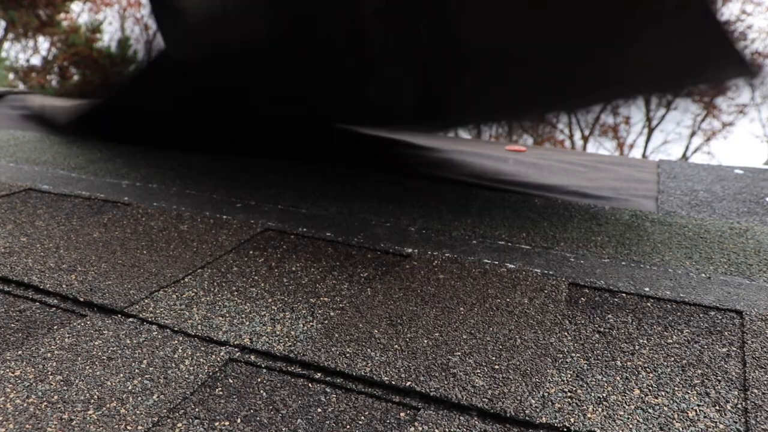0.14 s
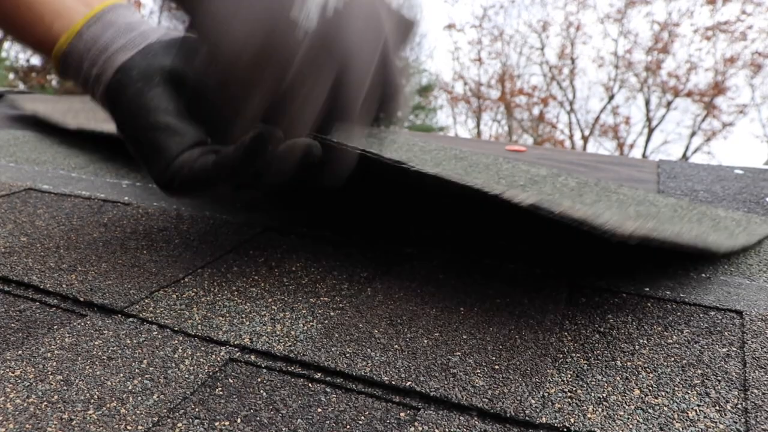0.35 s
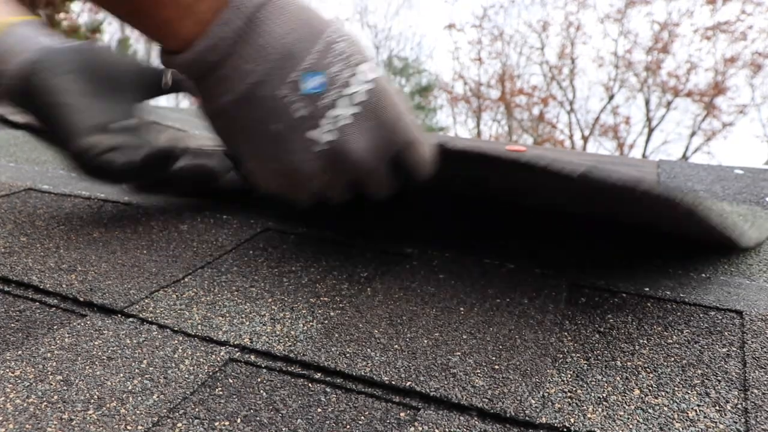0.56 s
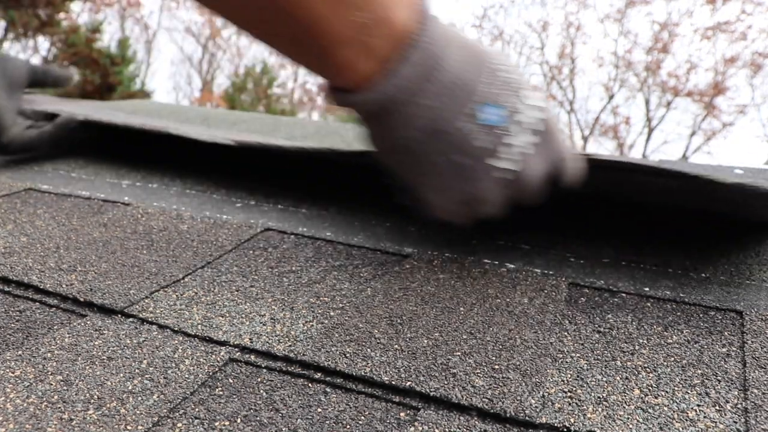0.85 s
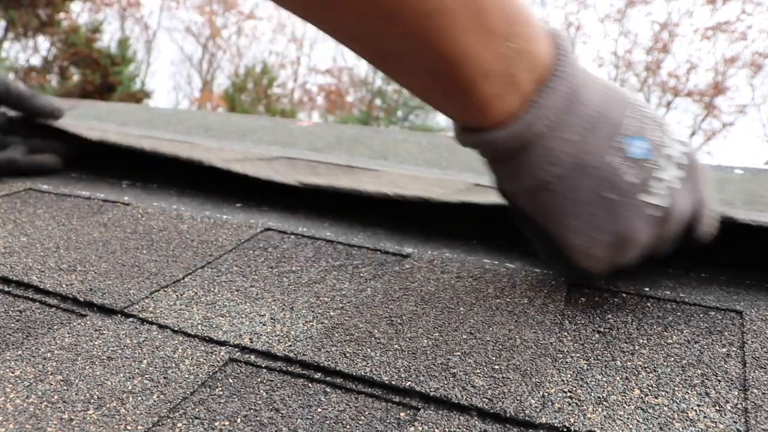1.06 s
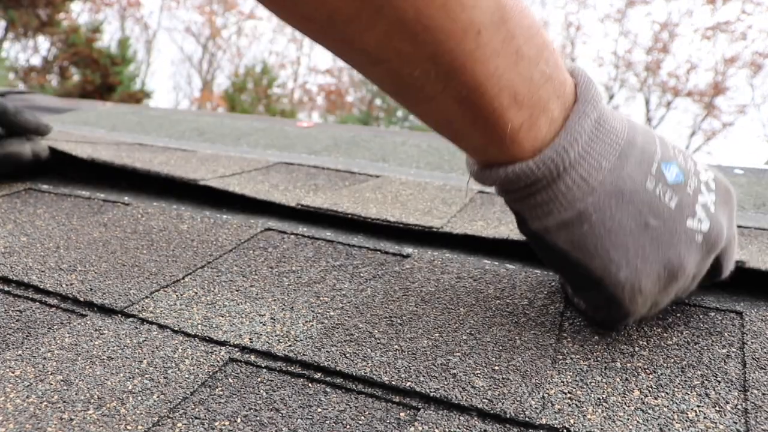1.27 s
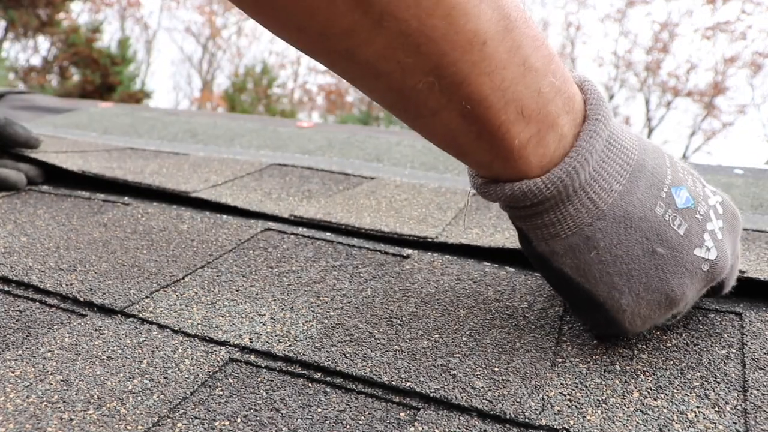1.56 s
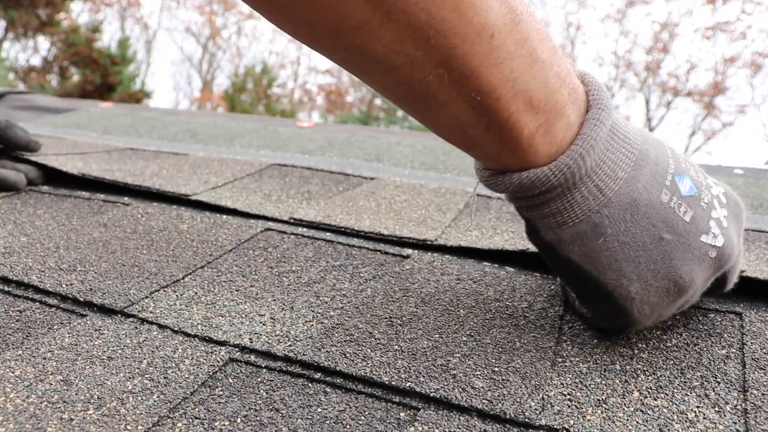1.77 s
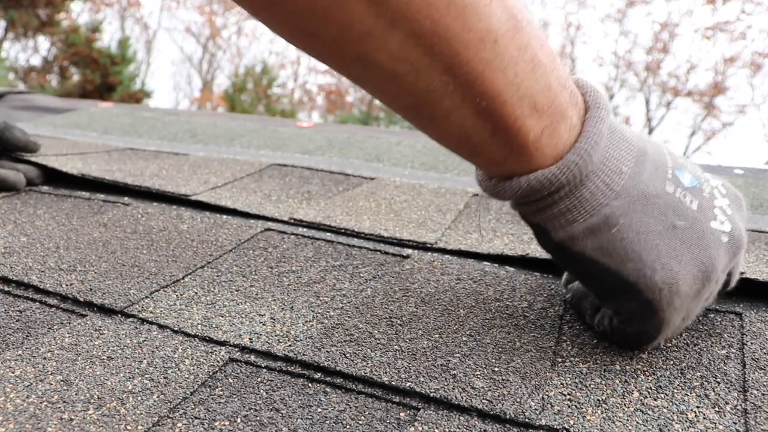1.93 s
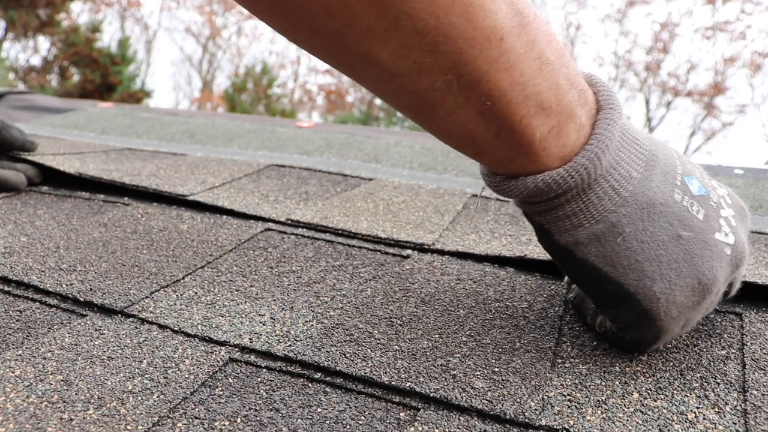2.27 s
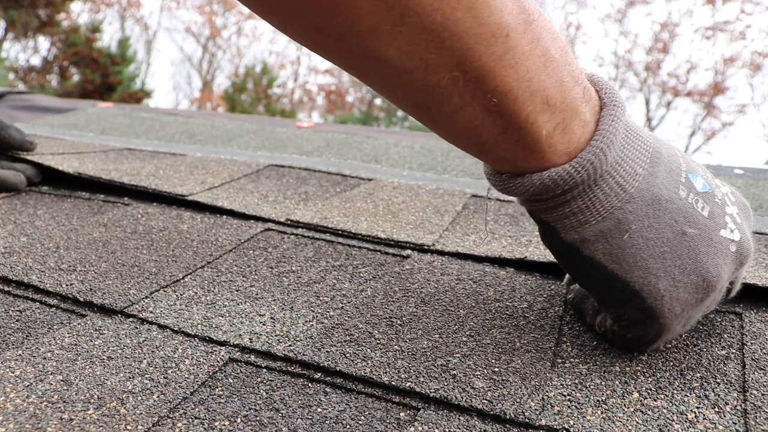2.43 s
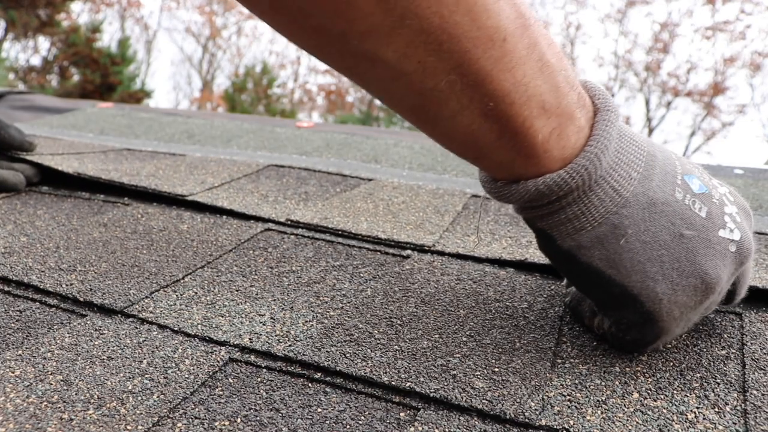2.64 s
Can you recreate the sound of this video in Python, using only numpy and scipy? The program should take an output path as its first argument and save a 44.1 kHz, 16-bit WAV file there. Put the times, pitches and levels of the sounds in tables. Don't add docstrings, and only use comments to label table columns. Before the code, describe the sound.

Close up outdoors, a limp, sandy shingle lands with a dull slap and rubs loudly over others for about a second, then short scuffs and tiny granule snaps follow over low far traffic.

```python
import sys
import numpy as np
from scipy import signal
from scipy.fft import rfft, irfft
from scipy.io import wavfile
from scipy.ndimage import uniform_filter1d

SR = 44100
rng = np.random.default_rng(int(sys.argv[2]) if len(sys.argv) > 2 else 0)


def gain_from_decibels(decibels):
    exponent = np.asarray(decibels, float) / 20
    return 10 ** exponent


def inscribe(sig):
    pcm = np.round(np.clip(np.atleast_2d(sig).T, -1, 1) * 32767)
    wavfile.write(sys.argv[1], SR, pcm.astype(np.int16))


N = 123479
EDGES = 28 * 2 ** np.arange(0, 9.6, .5)


def rms_one(x):
    return x / np.sqrt(np.mean(x ** 2) + 1e-20)


def at_hz(points, hz):
    point_hz, values = np.array(points).T
    return np.interp(np.log(hz), np.log(point_hz), values)


def centre(k):
    return np.sqrt(EDGES[k] * EDGES[k + 1])


def band(x, k):
    sos = signal.butter(2, EDGES[k:k + 2], "band", fs=SR, output="sos")
    return signal.sosfilt(sos, x + 1e-18)


def drift(rate_hz):
    r = np.exp(-2 * np.pi * rate_hz / SR)
    slow = signal.lfilter([1], [1, -2 * r, r * r], rng.standard_normal(N + SR))
    return rms_one(slow[SR:])


def scatter(index, sizes, pan_db, lag):
    ears = []
    for ear in (1, -1):
        arrival = np.clip(index + ear * lag // 2, 0, N - 1)
        ears.append(np.bincount(arrival, sizes * gain_from_decibels(ear * pan_db / 2), N))
    return np.array(ears)


def traffic(rubbing_db):
    # hz, level_db
    hum = [(18, -39), (30, -30.5), (179, -2), (1190, -18), (1500, -19.5), (2060, -21.5), (3220, -21),
           (4080, -23), (16000, -40)]
    # hz, likeness (1 = same)
    likeness = [(30, .5), (150, 1), (600, 0.8), (2000, .3), (8000, 0.05)]
    # time_s, level_db
    passing = [(0, 4.5), (1.5, 6.5), (2.0, 7.5), (2.8, 3.5)]
    level_db, patchy_db = -53, 1.2
    duck_from_db, duck_share, recover_db_per_s = -34, 0.42, 90

    out, white = 0, rng.standard_normal((2, 2, N))
    for k in range(len(EDGES) - 1):
        hz = centre(k)
        mid, side = band(white[k % 2], k)
        alike = np.clip(at_hz(likeness, hz), -1, 1)
        stereo = np.sqrt(1 + alike) * mid + np.sqrt(1 - alike) * side * [[1], [-1]]
        out = out + gain_from_decibels(at_hz(hum, hz) + patchy_db * drift(18)) * stereo
    t = np.arange(N) / SR
    ramp_db = recover_db_per_s * t
    held_db = np.maximum.accumulate(rubbing_db + ramp_db) - ramp_db
    held_db = uniform_filter1d(held_db, size=2000)
    duck_db = duck_share * np.maximum(held_db - duck_from_db, 0)
    swell_db = np.interp(t, *np.transpose(passing))
    return gain_from_decibels(level_db + swell_db - duck_db) * rms_one(out)


def drag():
    # start_s, stop_s, level_db
    drags = [
        (1.686, 1.876, -55),
        (1.899, 2.096, -50.5),
    ]
    # centre_hz, width_hz, level_db
    tones = [
        (1367, 440, 1.0),
        (2280, 250, -6.5),
        (3370, 900, -4),
    ]
    t, out, envelope = np.arange(N) / SR, 0, 0
    for start_s, stop_s, db in drags:
        arch = np.sin(np.pi * np.clip((t - start_s) / (stop_s - start_s), 0, 1))
        envelope = envelope + gain_from_decibels(db) * np.clip(3 * arch, 0, 1)
    for hz, width_hz, db in tones:
        sos = signal.butter(2, [hz - width_hz / 2, hz + width_hz / 2], "band", fs=SR, output="sos")
        tone = rms_one(signal.sosfilt(sos, rng.standard_normal((2, N))))
        out = out + gain_from_decibels(db) * tone * gain_from_decibels(3.7 * drift(5))
    return envelope * out


def slaps():
    # time_s, level_db
    landings = [
        (.166, -26),
        (.1995, -2),
        (.218, -11),
        (.408, -17.5),
        (.6, -20),
        (1.243, -16),
        (1.555, -24),
        (1.673, -27),
        (1.978, -22),
        (2.273, -38),
    ]
    # hz, level_db, t60_s
    modes = [
        (193, -10, .04),
        (520, -7.5, 0.035),
        (700, 7.5, 0.009),
        (1600, -5, 0.0027),
    ]
    out = np.zeros(N)
    for hz, level_db, t60_s in modes:
        blows = np.zeros(N)
        for time_s, db in landings:
            blows[int(time_s * SR)] = gain_from_decibels(db + level_db - 9)
        r, w = gain_from_decibels(-60 / (t60_s * SR)), 2 * np.pi * hz / SR
        out += signal.lfilter([0, np.sin(w)], [1, -2 * r * np.cos(w), r * r], blows + 1e-18)
    return out


def catches(side_db):
    # time_s, peak_db, centre_hz
    snaps = [(.0358, -28, 4120), (.1533, -27, 2400), (.199, -9, 2200), (.2184, -12, 2500),
             (.2334, -12, 1900), (.2614, -15, 4500), (.3202, -25, 3300), (.3527, -12, 2600),
             (.3657, -10, 1600), (.3724, -6, 2790), (.4114, -6, 7300), (.4773, -14, 3340),
             (.4805, -10, 9000), (.5045, -13, 9000), (.522, -22, 3000), (.5726, -6, 3000),
             (.5732, -10, 6500), (.5892, -8, 1900), (.5975, -7, 2500), (.647, -9, 2500), (.772, -10, 2000),
             (.812, -9, 2800), (1.017, -11, 3000), (1.053, -8, 3500), (1.0685, -10, 3000),
             (1.093, -9, 7000), (1.196, -17, 3000), (1.2116, -16, 3000), (1.2216, -14, 2710),
             (1.2445, -10, 7000), (1.2585, -10, 3000), (1.268, -10, 3000), (1.3235, -13, 3000),
             (1.3375, -12, 7000), (1.352, -16, 6500), (1.3734, -18, 8000), (1.3864, -19, 2920),
             (1.3999, -15, 3200), (1.4428, -14, 4500), (1.4503, -9, 7430), (1.46, -15, 7000),
             (1.4667, -11, 6000), (1.4794, -10, 4000), (1.5554, -12, 2910), (1.6362, -29, 4000),
             (1.6644, -20, 2600), (1.6731, -15, 4200),
             (1.9504, -27, 3500), (1.9778, -14, 2100), (2.0343, -33, 7500), (2.0517, -29, 4500),
            (2.0742, -27, 3560), (2.0986, -22, 5000), (2.1044, -22, 7000), (2.1227, -17, 2900),
            (2.1794, -16, 7070), (2.2264, -38, 5000), (2.2727, -24, 7550), (2.2824, -34, 7500),
            (2.3067, -17, 2100), (2.3334, -10, 4070), (2.3405, -15, 6000), (2.346, -20, 5000),
            (2.3605, -16, 4670), (2.3674, -20, 3770), (2.382, -22, 5500), (2.3914, -23, 5270),
            (2.4004, -24, 4020), (2.4139, -18, 3600), (2.4254, -24, 6890), (2.4508, -32, 3200),
            (2.4638, -28, 10000), (2.4748, -14, 7000), (2.487, -24, 3200), (2.492, -25, 4000),
            (2.5154, -20, 8410), (2.5222, -15, 3350), (2.5316, -14, 3100), (2.5496, -18, 10000),
            (2.554, -23, 5000), (2.6504, -27, 7430), (2.6729, -38, 7780), (2.6854, -40, 8500),
            (2.7038, -42, 10000), (2.7482, -29, 6600), (2.7687, -22, 3000), (2.786, -23, 4000)]
    decay_s, gain_db, ring, spread_s = .001, 1.0, .5, .000025
    fall_db = 3.0

    time_s, peak_db, hz = np.transpose(snaps)[:, :, None]
    steps = np.arange(512)
    rise_or_fall = np.where(steps < 30, .15, 1)
    envelope = np.exp(-np.abs(steps - 30) / (decay_s * SR * rise_or_fall))
    ringing = ring * np.sin(2 * np.pi * hz * steps / SR)
    crackle = (rng.standard_normal((len(time_s), 512)) + ringing) * envelope
    octaves = np.log2((np.arange(257) + 1) * SR / 512 / hz)
    loss_db = fall_db * octaves ** 2 * np.where(octaves < 0, 2, 1)
    crackle = irfft(rfft(crackle) * gain_from_decibels(-loss_db))
    crackle *= gain_from_decibels(peak_db + gain_db) / np.abs(crackle).max(axis=1, keepdims=True)
    index = ((time_s * SR).astype(int) + steps - 25).ravel()
    lag = np.round(rng.normal(0, spread_s * SR, len(time_s))).astype(int).repeat(512)
    return scatter(index, crackle.ravel(), side_db[index], lag)


def motion():
    # time_s, level_db, dulling_db_per_octave
    lay = [
        (0.155, -60, -8),
        (0.166, -27.5, 5),
        (0.187, -29, 6),
        (0.19, -20, 0),
        (0.205, -23, 2),
        (0.218, -19, 1),
        (0.234, -25.5, 2.5),
        (0.262, -24, 1),
        (.27, -31, 1.5),
        (0.316, -38.5, 4),
    ]
    shift = [
        (.335, -29, 2),
        (0.355, -21.5, 1.2),
        (0.371, -16, 2.9),
        (.385, -21, 2),
        (.4, -19, 1),
        (0.415, -24, -2.2),
        (0.459, -26.5, 1.5),
        (0.507, -31.5, -2),
        (.535, -36, 1.2),
    ]
    slide = [
        (0.562, -24.5, 3.2),
        (.582, -23, 1),
        (.59, -17.5, 0.8),
        (0.603, -16, 2.1),
        (.65, -19.5, 1.5),
        (.69, -24, 2.75),
        (0.759, -21, 1.5),
        (0.81, -16, 3.2),
        (.86, -20.5, 1.4),
             (.925, -16.5, 1.8),
        (.965, -19.5, 1.8),
        (1.02, -19.5, 1.8),
        (1.045, -20, 1.8),
        (1.09, -18, 1.5),
        (1.135, -19.5, 1.5),
        (1.165, -23, 0.78),
        (1.2, -31, 0),
        (1.219, -34, 0),
    ]
    settle = [
        (1.223, -23, 2),
        (1.24, -24, 3),
        (1.246, -20, 1.5),
        (1.27, -20.5, 1),
        (1.295, -23.5, 1.5),
        (1.321, -32, 2.1),
        (1.324, -21.5, 0.5),
        (1.355, -26, 0),
        (1.375, -32, 1.5),
    ]
    push = [
        (1.39, -37, 4),
        (1.432, -36, 5.5),
        (1.438, -30, 0),
        (1.478, -28, -2),
        (1.525, -21.5, -0.5),
        (1.556, -28, 1.5),
        (1.575, -39.5, 1),
        (1.6, -71, 0),
    ]
    # start_s, fastest_s, stop_s, level_db, dulling_db_per_octave
    nudges = [(0.0, -0.013, 0.11, -47.5, -0.5), (1.615, 1.667, 1.714, -37.5, 3),
              (1.86, 1.935, 1.974, -38.5, 3), (2.007, 2.056, 2.1, -49, -1.5), (2.088, 2.127, 2.195, -23, 2),
              (2.287, 2.325, 2.355, -21, 4.5), (2.325, 2.363, 2.447, -36, 0.5), (2.47, 2.48, 2.51, -37, -1),
              (2.487, 2.533, 2.58, -35, -1), (2.65, 2.68, 2.72, -56, -5), (2.743, 2.762, 2.865, -30.5, 1)]
    # time_s, left_over_right_db
    sides = [(0, -1), (.5, 1.5), (.6, -0.5), (1.4, -0.5), (1.55, 2), (1.95, -9.5), (2.08, 9.5), (2.13, -4),
             (2.2, 8.5), (2.32, -2.5), (2.43, 7), (2.7, -6.5), (2.8, 3.5)]
    rest_db, nudge_fall_db, nudge_shape = -75, 21.5, 1.7
    nudge_thins_db = 1.5

    t = np.arange(N) / SR
    time_s, level_points, weight_points = np.transpose(lay + shift + slide + settle + push)
    level_db = np.interp(t, time_s, level_points, rest_db, rest_db)
    weight = np.interp(t, time_s, weight_points)
    for start_s, fastest_s, stop_s, db, dull in nudges:
        span_s = np.where(t < fastest_s, fastest_s - start_s, stop_s - fastest_s)
        phase = np.abs(t - fastest_s) / span_s
        nudge_db = db - nudge_fall_db * phase ** nudge_shape
        nudge_weight = dull - nudge_thins_db * np.minimum(phase, 1)
        weight = np.where(nudge_db > level_db, nudge_weight, weight)
        level_db = np.maximum(level_db, nudge_db)
    return level_db, weight, np.interp(t, *np.transpose(sides))


def dulled(db_per_octave, hz):
    return gain_from_decibels(-db_per_octave * np.clip(np.log2(hz / 2780), -2.5, 2.5))


def grit(level_db, weight, side_db):
    # hz, level_db (per Hz)
    spectrum = [(200, -27), (500, -9), (1200, -3.5), (2600, 1.5), (4200, -3.5), (6800, -1.8), (11500, -8.5),
                (15500, -19)]
    ticks_per_s, ticks_follow = 7000, .7
    tick_size_db, tick_colour_db = 1.5, 5
    judder_db, judder_grows = 0.3, 0.105
    spread_s, spread_db = .00012, 0
    hiss_db, hiss_above_hz = -1.5, 1700
    light_loss, body_hz, patchy_db = 0.33, 910, 1.4
    laid_s, laid_loss_db = 1.44, 8.5

    rate = np.clip(ticks_per_s * gain_from_decibels(ticks_follow * (level_db + 20)), 150, SR / 2)
    index = np.flatnonzero(rng.random(N) < rate / SR)
    size = gain_from_decibels(tick_size_db * np.minimum(rng.exponential(1, N), 3.5)) * rng.choice([-1, 1], N)
    unevenness = (drift(48) + drift(175)) / np.sqrt(2)
    judder = (judder_db + judder_grows * np.clip(-11 - level_db, 0, 25)) * unevenness
    power = np.mean(size ** 2) * rate / SR
    size = (size / np.sqrt(power) * gain_from_decibels(level_db + judder))[index]
    place = rng.standard_normal(N)[index]
    colours = rng.standard_normal((2, N))[:, index]
    lag = np.round(-place * spread_s * SR).astype(int)
    pan_db = side_db[index] + spread_db * place

    light_db = light_loss * np.clip(-9.5 - level_db, 0, 30)
    laid_db = laid_loss_db * (np.arange(N) / SR > laid_s)
    hiss_level_db = level_db + judder + hiss_db + np.outer([.5, -.5], side_db)
    hiss = rng.standard_normal((2, N)) * gain_from_decibels(hiss_level_db) * gain_from_decibels(-light_db)

    out = 0
    for k in range(5, len(EDGES) - 1):
        hz = centre(k)
        colour_db = tick_colour_db * (colours[0] * np.cos(k * 0.6907) + colours[1] * np.sin(k * 0.689))
        mean_db = 0.11 * tick_colour_db ** 2
        ticks = scatter(index, size * gain_from_decibels(colour_db - mean_db), pan_db, lag)
        body_loss_db = (light_db + laid_db) / (1 + (hz / body_hz) ** 4)
        gain = dulled(weight, hz) * gain_from_decibels(patchy_db * drift(17.4) - body_loss_db)
        rub = band((ticks + hiss * (hz > hiss_above_hz)) * gain, k)
        out = out + (-1) ** k * gain_from_decibels(at_hz(spectrum, hz)) * rub
    return gain_from_decibels(5.3) * out


def echoes(x):
    level_db, t60_s = -15, 0.032
    t = np.arange(SR // 8) / SR
    tail = rng.standard_normal((2, len(t))) * gain_from_decibels(-60 * t / t60_s) * (t > .002)
    tail = tail / np.sqrt(np.sum(tail ** 2) / 2)
    wet = signal.fftconvolve(x, tail, axes=1)[:, :N]
    return gain_from_decibels(level_db) * signal.lfilter([.5], [1, -.5], wet)


def scene():
    level_db, weight, side_db = motion()
    near = grit(level_db, weight, side_db) + catches(side_db) + slaps()
    near = signal.sosfilt(signal.butter(3, 203, "high", fs=SR, output="sos"), near)
    near = signal.sosfilt(signal.butter(3, 13360, fs=SR, output="sos"), near)
    return near + echoes(near) + traffic(level_db) + drag()


def low_pass(x):
    return signal.sosfilt(signal.butter(12, 16310, fs=SR, output="sos"), x)


def record(dry):
    ear_hz, ear_db = 2360, -10.5
    sos = signal.butter(1, [ear_hz / 1.15, ear_hz * 1.54], "band", fs=SR, output="sos")
    lift = signal.sosfilt(sos, dry)
    x = dry + gain_from_decibels(ear_db) * lift * [[-1], [1]]
    x = signal.sosfilt(signal.cheby2(10, 60, 16500, fs=SR, output="sos"), x)
    return low_pass(np.clip(x, -1, 1))


dry = scene()
out = record(dry)
inscribe(out)
```